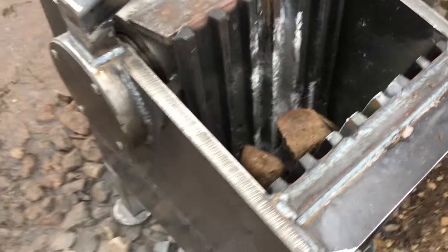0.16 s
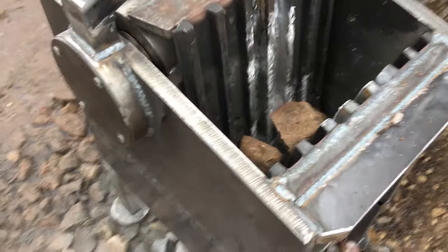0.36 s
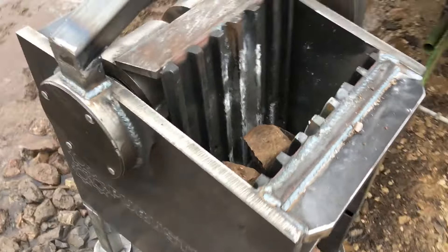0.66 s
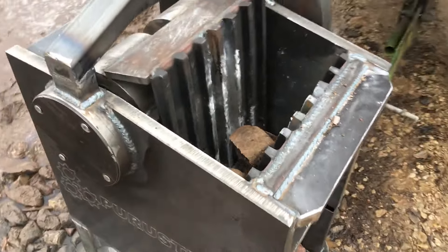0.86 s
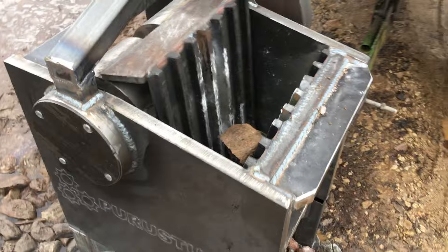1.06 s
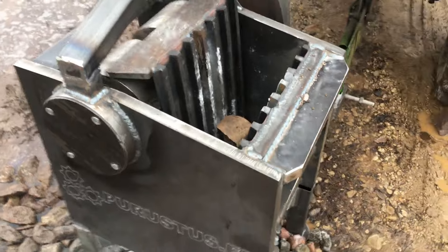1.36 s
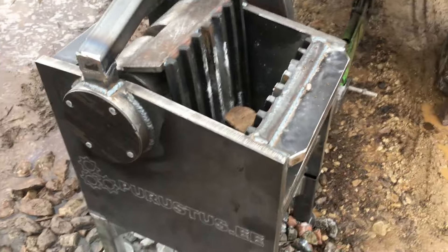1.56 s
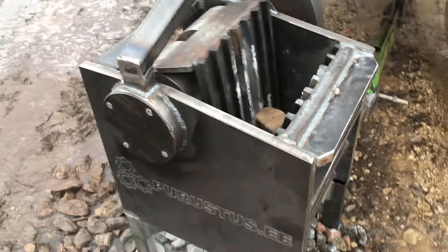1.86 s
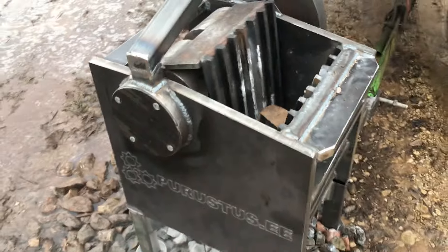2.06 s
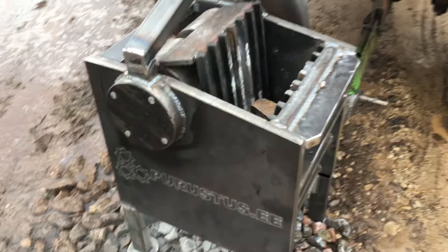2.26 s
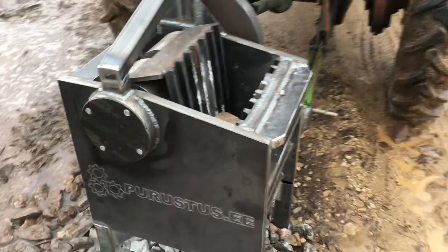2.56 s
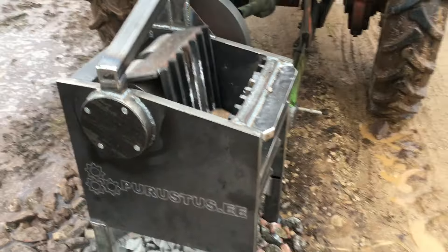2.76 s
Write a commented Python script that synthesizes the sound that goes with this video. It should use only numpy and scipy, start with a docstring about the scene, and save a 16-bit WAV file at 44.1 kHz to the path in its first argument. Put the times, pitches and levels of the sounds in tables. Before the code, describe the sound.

A small jaw crusher breaks stones with sharp cracks and juddering steel knocks over tractor rumble

```python
"""A small jaw crusher chews stones outdoors, close to the microphone, driven by an idling tractor.
Blows judder the jaw and shake the resonances of its steel frame; stones crack and crumble in bright
bursts of filtered grit, each with a ring, and one squeals on the jaw as a gliding tone with overtones.
The diesel throbs underneath as a sum of engine orders and clatters as patchy ticking noise with a frame
hum; a fast limiter holds the peaks."""
import sys
import numpy as np
from scipy import signal
from scipy.fft import rfft, irfft
from scipy.io import wavfile
from scipy.ndimage import uniform_filter1d

SR = 44100
rng = np.random.default_rng(int(sys.argv[2]) if len(sys.argv) > 2 else 0)


def materialize(psi):
    """Save the field psi as 16-bit PCM at rate SR to the path in sys.argv[1].

    A 1-D psi becomes a single channel; in a 2-D psi each row is a channel.
    """
    bounded = np.clip(np.atleast_2d(psi).T, -1, 1)
    quanta = np.round(bounded * 32767).astype(np.int16)
    wavfile.write(sys.argv[1], SR, quanta)


N = 128331  # samples

# resonances of the steel frame and jaw plates: f/Hz, width/Hz, level/dB
FRAME_MODES = [(207.5, 51, -9), (296.4, 20.4, -0.5), (422, 52, -10), (637.3, 15, -5.5), (935, 104, -5),
               (1062, 96, -11), (1157, 30, -18), (1750, 280, -11.5), (2030, 240, -13), (2740, 480, -16),
               (3190, 870, -27)]


def amp(db):
    """Amplitude factor of a level in dB."""
    return 10 ** (np.asarray(db) / 20)


def evened(x):
    """Scales x to rms 1."""
    return x / np.sqrt(np.mean(x ** 2) + 1e-20)


def coloured(x, points):
    """Filters x by a spectrum given as (f/Hz, level/dB) points, joined on a log frequency axis."""
    hz = np.fft.rfftfreq(len(x), 1 / SR)
    f, db = np.transpose(points)
    gain = amp(np.interp(np.log(hz + 1), np.log(f), db))
    return irfft(rfft(x) * gain, len(x))


def band(x, lo_hz, hi_hz):
    """Band-pass filter."""
    return signal.sosfilt(signal.butter(3, [lo_hz, hi_hz], "band", fs=SR, output="sos"), x)


def ring(x, hz, width_hz):
    """One resonance, fixed or gliding; steady white noise of rms 1 leaves it at rms 1."""
    r = np.exp(-np.pi * width_hz / SR)
    turn = np.exp(2j * np.pi * np.cumsum(hz * np.ones(len(x))) / SR)
    # shift the resonance down to 0 Hz, smooth there, shift back up
    smoothed = signal.lfilter([1], [1, -r], x / turn)
    return np.sqrt(2 * (1 - r * r)) * (turn * smoothed).real


def grains(per_s, spread_db):
    """Noise of tiny bursts of random size over a weak steady floor, at rms 1."""
    struck = rng.random(N) < per_s / SR
    size = amp(spread_db * np.minimum(rng.exponential(1, N), 5)) * struck
    envelope = np.sqrt(0.15 + uniform_filter1d(size ** 2, size=30))
    return evened(envelope * rng.standard_normal(N))


def drift(ms):
    """Slow random wander of rms 1: noise smoothed twice over the given time."""
    width = int(ms * SR / 1000)
    return evened(uniform_filter1d(uniform_filter1d(rng.standard_normal(N), width), width))


def patchy(x, depth_db, bins, frames):
    """Raises and lowers random patches of the spectrogram, bins wide and frames long."""
    z = signal.stft(x, SR, nperseg=512)[2]
    noise = rng.standard_normal(z.shape[::-1]).T
    patch = evened(uniform_filter1d(uniform_filter1d(noise, bins, 0), frames, 1))
    y = signal.istft(z * amp(depth_db * patch), SR, nperseg=512)[1]
    return np.pad(y, (0, 512))[:N]


def blows():
    """Each blow judders the jaw at a sagging, uneven rate and shakes the frame modes near that rate."""
    # jaw blows on the frame: t/s, level/dB, f/Hz (centre of the push),
    # brightness/dB (push on modes above 800 Hz), length/s
    jaw_blows = [(.022, -13.5, 300, -24, .012), (.032, -9, 302, -8, 0.012), (0.049, -13, 282, -24, 0.01),
                 (0.099, -23, 322, -1, 0.011), (0.157, -25, 286, -23, 0.024), (0.203, -11, 287, -9, 0.024),
                 (0.235, -7, 317, -2.5, 0.013), (0.246, -9, 310.4, -6, 0.021),
                 (0.384, -21.5, 326, -15, 0.04), (0.437, -21, 304.5, -3, 0.031),
                 (0.467, -18.5, 296, -1, 0.017), (0.571, -13.5, 306, -10, 0.024),
                 (0.611, -8, 298, -31, 0.015), (0.678, -20.5, 297, -1, .02), (0.75, -19, 317, -1, 0.021),
                 (.799, -5, 301.2, -16, 0.029), (.824, -11.5, 288, -2, 0.013),
                 (0.878, -24.5, 293, 2, 0.019), (0.926, -16.5, 304.5, -20, 0.034),
                 (0.988, -5, 304, -24, 0.019), (.99, -8.5, 437.5, -15, 0.022), (1.005, -15, 272, 2, 0.022),
                 (1.118, -19.5, 300, 1, .028), (1.149, -5.5, 645, -17, 0.01),
                 (1.168, -2.5, 335, -29, 0.011), (1.175, -7.5, 433, -22, 0.025),
                 (1.307, -16.5, 296, -23, 0.02), (1.353, -16, 409.6, -20, 0.011),
                 (1.362, -7.5, 303, -15, 0.014), (1.444, -35, 655, -8, 0.027),
                 (1.502, -20, 292, -10, 0.026), (1.546, -1, 436.6, -34, 0.014),
                 (1.553, -18, 320, -3.5, 0.04), (1.692, -23, 275, -7, 0.032),
                 (1.732, -9.5, 300.7, -17, 0.017), (1.879, -24, 285, -14, 0.034),
                 (1.911, -20.5, 224.3, 3, 0.015), (2.059, -18, 300, -17, 0.034),
                 (2.102, -11, 291, -5, 0.023), (2.119, -10, 199, 1, 0.014), (2.278, -7, 294.8, -11, 0.021),
                 (2.49, -17, 248, -18, 0.01), (2.626, -10.5, 284, -13, 0.021),
                 (2.67, -1, 464, -8.5, 0.0074), (2.676, -12, 300, -10, .01),
                 (2.692, -13.5, 327, 0.5, 0.0095), (2.814, -13, 321, -20, 0.014),
                 (2.855, -20, 328, -3, 0.027), (2.863, -7.5, 491, -8, 0.015),
                 (2.876, -11.5, 300, -6, 0.017)]
    push_db, push_oct = -6, 0.72  # level and spread of the push around its centre
    rise_s, fall_s = 0.00477, 0.0074  # fall is a time constant
    judder_db, waver_db, overtone = -4, 2.5, 0.36
    jitter, sag_per_s = 0.13, 4.9  # fractions of the judder rate

    t, out = np.arange(N) / SR, np.zeros(N)
    shapes = np.zeros((len(jaw_blows), N))
    rate_waver, grip = drift(3.57), drift(3)
    start_turns = rng.random(len(jaw_blows))
    for shape, (s, level_db, rate_hz, _, length), start in zip(shapes, jaw_blows, start_turns):
        i = slice(int((s - rise_s) * SR), int((s + length + .06) * SR))
        since = t[i] - s
        rise = np.clip(since / rise_s + 1, 0, 1)
        shape[i] = rise * np.exp(-np.maximum(since - length, 0) / fall_s)
        rate = rate_hz * (1 + jitter * rate_waver[i] - sag_per_s * (since - length / 2))
        phase = 2 * np.pi * (start + np.cumsum(rate) / SR)
        level = amp(level_db + judder_db + waver_db * grip[i])
        out[i] += level * shape[i] * (np.sin(phase) + overtone * np.sin(2 * phase))

    _, db, hz, bright_db, _ = np.transpose(jaw_blows)
    shake = rng.standard_normal(N)
    for f, width_hz, mode_db in FRAME_MODES:
        near = np.exp(-(np.log2(f / hz) / push_oct) ** 2) + (f > 800) * amp(bright_db)
        push = near * amp(db + push_db + mode_db)
        force = np.sqrt(push ** 2 @ shapes ** 2)  # overlapping blows add in power
        out += ring(force * shake, f, width_hz)
    return out


def cracks():
    """Each crack is a snap of grit that dies away, with its own colour and a ring of the stone."""
    # cracks and crumbling: t/s, level/dB (11-17 kHz), then relative to it body/dB (1.3-5 kHz),
    # edge/dB (5-8 kHz), sheen/dB (8-11 kHz); t60/s, ring f/Hz, ring level/dB (relative)
    stone_cracks = [(0.0353, -6, -2, 2, -6.5, 0.095, 2090, -0.5),
                    (0.104, -26, -10, -8, -11, 0.099, 1660, 1),
                    (0.1491, -20, -16, -17, -16, 0.067, 1530, -18),
                    (0.1908, -15.5, -5, -5, -5, 0.23, 1490, -4), (0.2005, -6, -2, -2, -8, 0.15, 2820, -2.5),
                    (0.2244, -13, 4.5, -18, -9, 0.16, 2700, -5),
                    (0.3406, -21, -12, -15, -16, 0.064, 1490, -7),
                    (0.383, -11.5, -18, -7, -2.5, 0.096, 2120, -11),
                    (0.397, -15, -5, -3, 1, 0.15, 2270, -10),
                    (0.4107, -11.5, -5.5, -5, -14, 0.098, 1960, -5.5),
                    (0.5494, -23.5, 1.5, -6, -12, 0.15, 1690, 2),
                    (0.6094, -22, -8, -14, -13, 0.36, 1884, -3.5), (0.7414, -26, 5, 2, 1, 0.24, 1940, -5),
                    (0.7794, -17.5, -5, -8, -12, 0.19, 1990, -7),
                    (0.8016, -11.5, -11, -13, -15, 0.15, 2000, -8), (0.819, -18, 4, -3, -9, 0.17, 3470, -7),
                    (0.9208, -18, -15, -16, -8, 0.32, 1580, -3.5),
                    (0.991, -18, -10, -12, -28, 0.2, 2700, -7), (1.0108, -24, 1, -7, -7, 0.13, 1730, -1),
                    (1.1222, -14, -10, -2, -20, 0.21, 6600, -5), (1.1424, -5, -2, -4, -6, 0.16, 1960, -11),
                    (1.1627, -10, -1, -11, -22, 0.071, 3050, -7),
                    (1.1896, -23.5, 11, 2, -7, 0.16, 1730, -7), (1.3094, -20, -6, -12, -12, 0.28, 3600, -9),
                    (1.3594, -22, -7, 4, 1, 0.17, 1800, -12),
                    (1.4835, -18, -4.5, -12, -5, 0.45, 5520, -9.5),
                    (1.5552, -14, -11, 1, 2, 0.083, 1470, -13), (1.736, -18.5, -4, -9, -13, 0.17, 1794, -1),
                    (1.8744, -25, -12, -6, 0, 0.15, 1590, -11), (1.9068, -13, -6, -2.5, -13, 0.15, 1730, 1),
                    (1.9394, -27.5, 5, -17, -1, 0.19, 2090, -7),
                    (2.078, -22.5, -6, -19, -7.5, 0.36, 1820, -10),
                    (2.1077, -14, -17, -10, -18, 0.19, 1710, -7),
                    (2.1325, -24, 12, 11.5, -16, 0.22, 1600, -5), (2.2154, -19, -4, 1, -4, 0.17, 1970, 0),
                    (2.2256, -13.5, -8, 0, 1, 0.18, 1560, -9),
                    (2.243, -9, -4.5, -2.5, -1.5, 0.15, 6050, -8.5),
                    (2.276, -18, -8, -5, -6, 0.1, 1640, -7), (2.3049, -5, -1, 5, 1, 0.13, 1580, -2.5),
                    (2.3294, -31, -3, 4, -6, 0.12, 3280, -7), (2.449, -21, -15, -12, -15, 0.12, 1551, -14),
                    (2.4767, -19.5, -13, -1, 2, 0.18, 2510, -8),
                    (2.5795, -20.5, -2, -5, -24, 0.099, 2640, -23),
                    (2.6529, -14, -11, -16, -10, 0.15, 1570, -9),
                    (2.6625, -7.5, -19, -19, -22, 0.09, 1820, -21),
                    (2.681, -18, 7.5, -2, -9, 0.15, 1590, -9), (2.804, -17.5, 4, 8.5, -1, 0.2, 4240, 0.5),
                    (2.8192, -14.5, 0, -14, -15, 0.24, 1610, -6), (2.8396, -14.5, 2, 8, 5, 0.12, 3140, 2.5),
                    (2.851, -7, -5, -11, -15, 0.091, 3680, -5), (2.8686, -17, 6, 6.5, -13, 0.17, 1550, -7)]
    # spectrum of the grit: f/Hz, level/dB (per Hz)
    grit_spectrum = [(710, -26), (1200, -10), (1310, 15), (2040, -25), (2790, 2), (3590, 2), (4750, -7.5),
                     (5970, 15), (7660, -10), (9210, 2.5), (10500, -12.5), (12300, -14), (16000, -19.5)]
    crack_db, ring_width_hz = -7.5, 330
    upper_ratio, upper_db = 2.05, -7.5  # second ring, relative to the first
    snap_s, swell_per_s = .0006, .12  # rise = snap + swell x t60 squared: long crumbles start softly

    grit = coloured(grains(per_s=2500, spread_db=3.5), grit_spectrum)
    grit = patchy(grit, 3., bins=4, frames=9)
    t = np.arange(int(.3 * SR)) / SR
    power, out = np.zeros((4, N + SR)), np.zeros(N + SR)
    for s, db, body_db, edge_db, sheen_db, t60, hz, ring_db in stone_cracks:
        rise = snap_s + swell_per_s * t60 ** 2
        fall_db = 60 * np.maximum(t - rise, 0) / t60
        shape = np.minimum(t / rise, 1) ** 2 * amp(db + crack_db - fall_db)
        first = round((s - rise) * SR)
        i = slice(first, first + len(t))
        power[:, i] += (amp([[body_db], [edge_db], [sheen_db], [0]]) * shape) ** 2
        hit = shape * rng.standard_normal(len(t))
        lower = ring(hit, hz, ring_width_hz)
        upper = ring(hit, upper_ratio * hz, ring_width_hz)
        out[i] += amp(ring_db) * (lower + amp(upper_db) * upper)

    out = out[:N]
    bands_hz = [(1300, 5000), (5000, 8000), (8000, 11000), (11000, 17000)]
    for p, (lo_hz, hi_hz) in zip(power, bands_hz):
        out = out + np.sqrt(p[:N]) * evened(band(grit, lo_hz, hi_hz))
    return out


def squeal():
    """Stone sticking and slipping on the jaw: a gliding tone and overtones, part clean and part fuzzy."""
    # glide of the squeal: t/s, f/Hz, level/dB, octave level/dB
    glide = [(2.287, 1636, -33, -57), (2.295, 1654, -5, -37), (2.302, 1634, -1, -11),
             (2.314, 1543, 1.5, -4), (2.322, 1555, -4.5, -13), (2.33, 1643, -11, -6.5),
             (2.339, 1665, -15, -12), (2.352, 1540, -33, -31), (2.367, 1530, -50, -27),
             (2.39, 1520, -50, -39)]
    width_hz, rough, upper_db = 71, .33, -17  # rough = fuzzy share; upper = 3rd and 4th under the octave

    t, out = np.arange(N) / SR, np.zeros(N)
    s, hz, db, octave_db = np.transpose(glide)
    f = np.interp(t, s, hz)
    for k, level_db in ((1, db), (2, octave_db), (3, octave_db + upper_db), (4, octave_db + upper_db)):
        clean = np.sqrt(2) * np.sin(2 * np.pi * k * np.cumsum(f) / SR)
        fuzz = ring(rng.standard_normal(N), k * f, k * width_hz)
        level = amp(np.interp(t, s, level_db, -99, -99))
        out += level * ((1 - rough) * clean + rough * fuzz)
    return out


def engine():
    """Low orders of the engine cycle; the exhaust smears each beat so that the high orders come first."""
    # engine orders: multiple of the cycle rate, level/dB (rms)
    orders = [(3, -65), (4, -48), (5, -37), (6, -49), (7, -38), (8, -40), (9, -39), (10, -52), (11, -37),
              (12, -34), (13, -43), (14, -50), (15, -52), (22, -47), (23, -46), (24, -42)]
    cycle_hz, fire_s = 8.6535, .0961  # fire_s is the time of one beat
    lead_turns, smear_turns, wobble_db = .438, .09, .8

    turns = (np.arange(N) / SR - fire_s) * cycle_hz
    out = np.zeros(N)
    for k, db in orders:
        level = np.sqrt(2) * amp(db + wobble_db * drift(190))
        out += level * np.cos(2 * np.pi * (k * turns + smear_turns * k * k + lead_turns))
    return out


def clatter():
    """Valve gear, gears and bearings: patchy ticking noise with passing rings; the frame hums along."""
    # spectrum of the clatter: f/Hz, level/dB (per Hz)
    clatter_spectrum = [(25, -45), (45, -1), (110, -17), (157, -9.5), (295, -7.5), (500, -13.5), (760, -11),
                        (1040, -11.5), (1460, -9.5), (1760, -15.5), (2540, -16), (3500, -23), (4910, -36.5),
                        (6550, -21.5), (7870, -31.5), (10500, -28), (11500, -26), (13500, -27),
                        (16000, -24)]
    clatter_db, hum_db, hum_tilt_db = -25, -32, 0.72  # tilt is per octave above 300 Hz

    ticks = coloured(grains(per_s=2300, spread_db=2.5), clatter_spectrum)
    broad = patchy(ticks, 1.2, bins=8, frames=8)
    wash = evened(patchy(broad, 3.5, bins=1, frames=24))  # narrow, long patches sound as passing rings
    shake, hum = rng.standard_normal(N), np.zeros(N)
    for f, width_hz, db in FRAME_MODES:
        hum += amp(db + hum_tilt_db * np.log2(f / 300)) * ring(shake, f, width_hz)
    return amp(clatter_db) * wash + amp(hum_db) * hum


def scene():
    """Crusher and tractor together, as one channel."""
    return (blows() + cracks() + squeal() + engine() + clatter())[None]


def record(dry):
    """Above the bass, gain drops on loud moments and recovers; peaks round off; then the band limit."""
    split_hz, edge_hz = 140, 15800
    limit_db, squeeze, recover_db_per_s, ceiling = -10, 0.61, 16, 0.75  # squeeze = dB cut per dB over

    bass = signal.sosfiltfilt(signal.butter(4, split_hz, fs=SR, output="sos"), dry)
    power_db = 10 * np.log10(abs(uniform_filter1d(dry[0] ** 2, 300)) + 1e-12)
    fall_db = np.arange(N) * recover_db_per_s / SR
    held_db = np.maximum.accumulate(power_db + fall_db) - fall_db  # jumps up, falls steadily
    over_db = np.maximum(held_db - limit_db, 0)
    limited = bass + (dry - bass) / amp(squeeze * uniform_filter1d(over_db, 150))
    rounded = ceiling * np.tanh(limited / ceiling)
    low_pass = signal.firwin(511, edge_hz, window=("kaiser", 9), fs=SR)
    return signal.oaconvolve(rounded, low_pass[None], "same")


dry = scene()
out = record(dry)
materialize(out)
```